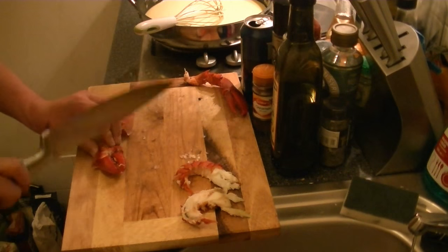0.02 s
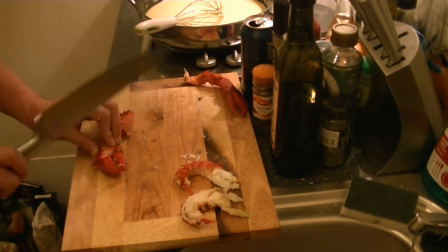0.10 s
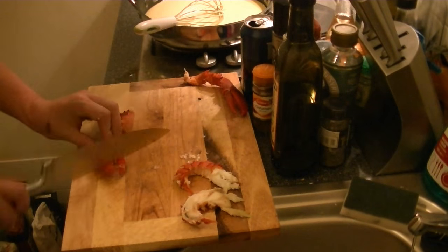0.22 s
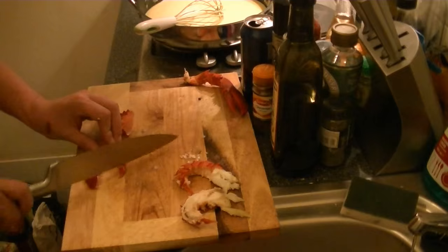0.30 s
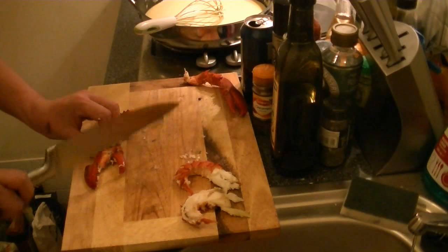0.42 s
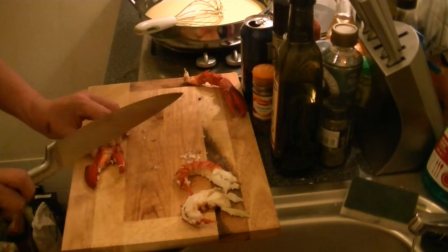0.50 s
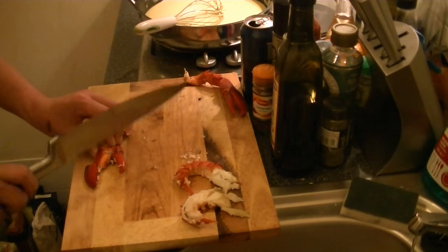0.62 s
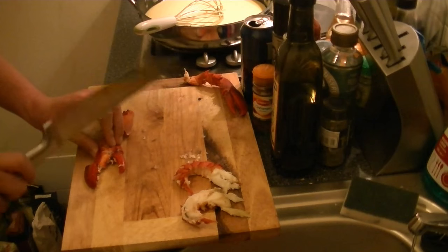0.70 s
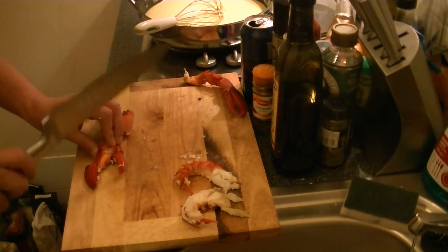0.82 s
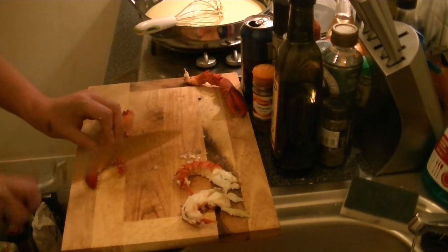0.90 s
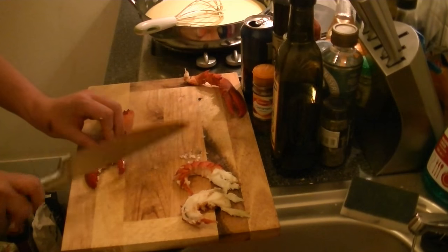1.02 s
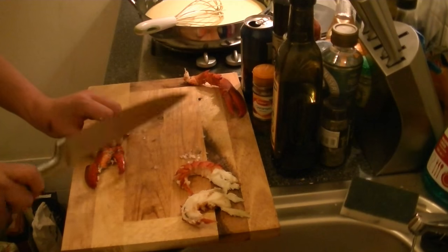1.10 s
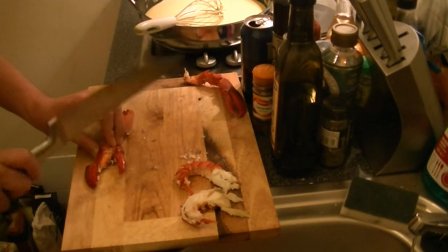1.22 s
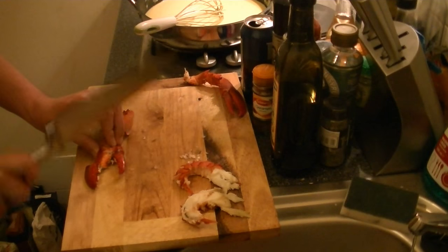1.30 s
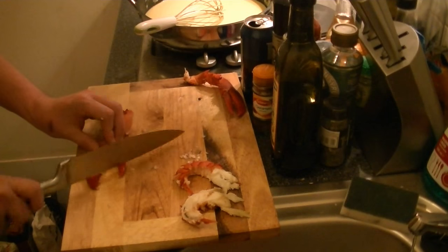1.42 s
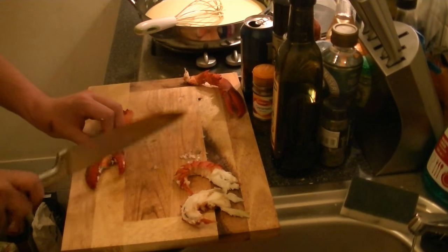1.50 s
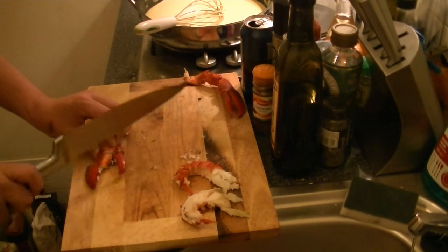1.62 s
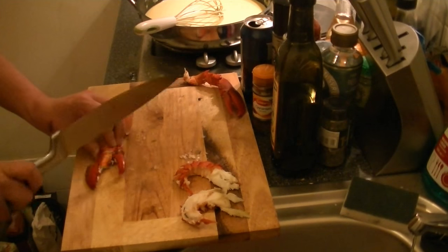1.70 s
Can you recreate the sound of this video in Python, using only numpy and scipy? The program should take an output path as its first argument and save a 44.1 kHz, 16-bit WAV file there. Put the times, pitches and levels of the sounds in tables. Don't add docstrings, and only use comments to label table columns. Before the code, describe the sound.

Shellfish claws are cracked with a heavy knife on wood. The tail of an earlier blow and a faint scrape lead to a hollow chattering glance at 0.23 s, then the loudest crack at 0.28 with high blade ring. Shell chips tick from 0.55 to 0.93. A weaker crack lands at 0.96, a dry one without ring at 1.4; a claw drags at 1.7. Hard kitchen reverberation, low appliance hum, close clipped microphone.

```python
import sys
import numpy as np
from scipy import signal
from scipy.fft import rfft, irfft, next_fast_len
from scipy.io import wavfile
from scipy.ndimage import uniform_filter1d, minimum_filter1d

SR = 44100
rng = np.random.default_rng(int(sys.argv[2]) if len(sys.argv) > 2 else 0)


def rack_gain(trim_db):
    fader = np.asarray(trim_db, float)
    return 10 ** (fader / 20)


def file_out(sig):
    cols = np.atleast_2d(sig).T
    lim = np.clip(cols, -1, 1)
    pcm = np.round(lim * 32767).astype(np.int16)
    wavfile.write(sys.argv[1], SR, pcm)


N = 79380
LEAD = 13230


def unit(x):
    return x / np.sqrt(np.mean(x ** 2) + 1e-20)


def along(points, hz):
    f, value = np.transpose(points)
    return np.interp(np.log(hz + 1), np.log(f + 1), value)


def filtered(x, response):
    size = next_fast_len(x.shape[-1] + SR // 2)
    spectrum = rfft(x, size) * response(np.fft.rfftfreq(size, 1 / SR))
    return irfft(spectrum, size)[..., :x.shape[-1]]


def causal(gain):
    cepstrum = irfft(np.log(gain + 1e-6))
    half = len(cepstrum) // 2 - 1
    fold = np.r_[1, np.full(half, 2), 1, np.zeros(half)]
    return irfft(np.exp(rfft(cepstrum * fold)))


def snap(resonances, floor):
    f = np.fft.rfftfreq(8192, 1 / SR)
    power = sum(rack_gain(2 * db) * (f * width) ** 2 / ((hz * hz - f * f) ** 2 + (f * width) ** 2)
                for hz, width, db in resonances)
    click = causal(floor(f) + np.sqrt(power))
    return click[:4096] / np.linalg.norm(click)


def ring(modes, seconds, spread_db, rise_s=1e-4):
    t = np.arange(int(seconds * SR)) / SR
    total = 0
    for hz, db, t60 in modes:
        level_db = db + spread_db * rng.standard_normal()
        total = total + rack_gain(level_db - 60 * t / t60) * np.sin(2 * np.pi * hz * t)
    return (1 - np.exp(-t / rise_s)) * total


def add(track, s, x):
    i = round(s * SR) + LEAD
    track[i:i + len(x)] += x[:len(track) - i]


# f/Hz, density/dB
HUM = [(30, -3), (100, 2), (200, -8.5), (394, -10.5), (650, 0), (1200, -11), (2250, -17), (4650, -27.5)]
HUM_DB, HISS_DB = -50, -83


def kitchen():
    shape = HUM + [(16000, -26)]
    noise = unit(filtered(rng.standard_normal(N + LEAD), lambda hz: rack_gain(along(shape, hz))))
    drift_db = 0.72 * unit(uniform_filter1d(rng.standard_normal(N + LEAD), 1500))
    return rack_gain(HUM_DB + drift_db) * noise + rack_gain(HISS_DB) * rng.standard_normal(N + LEAD)


# f/Hz, t60/s
KITCHEN_T60 = [(60, 0.11), (300, .45), (700, 0.41), (2000, 0.26), (5000, 0.28), (9000, 0.22), (13000, 0.19),
               (16000, 0.13)]
# f/Hz, t60/s
HALL_T60 = [(100, 0.5), (700, 0.79), (4000, 1.335), (16000, 0.6)]
HALL_DB = -40.5
GAP_S, BUILD_S = 0.0018, 0.005


def room(x, db):
    hz, t, z = signal.stft(rng.standard_normal(SR), SR, nperseg=256)
    near = rack_gain(-60 * t / along(KITCHEN_T60, hz)[:, None])
    far = rack_gain(HALL_DB - 60 * t / along(HALL_T60, hz)[:, None])
    tail = signal.istft(z * (near + far), SR, nperseg=256)[1]
    tail = tail * (1 - np.exp(-np.arange(len(tail)) / SR / BUILD_S))
    echo = np.pad(tail / np.linalg.norm(tail), (int(GAP_S * SR), 0))
    wet = signal.fftconvolve(x, echo)
    return np.pad(x, (0, len(wet) - len(x))) + rack_gain(db) * wet


# t/s, rise/s, fade/s, level/dB
DRAGS = [
    (.062, 0.012, 0.077, -46.5),
    (.165, 0.016, 0.024, -53.5),
    (1.70, 0.025, 0.078, -43),
]
# f/Hz, level/dB
FRICTION = [(300, -30), (2000, 11), (5000, 3), (8000, 6), (13000, 0), (16000, -1)]


def drags():
    t = (np.arange(N + LEAD) - LEAD) / SR
    shape = 0
    for s, rise, fade, db in DRAGS:
        swell = np.minimum((t - s) / rise, 1 - (t - s - rise) / fade)
        shape = shape + rack_gain(db) * np.clip(swell, 0, 1)
    grain_db = 1.3 * unit(uniform_filter1d(rng.standard_normal(len(t)), 60))
    grain = rng.standard_normal(len(t)) * rack_gain(grain_db)
    return shape * unit(filtered(grain, lambda hz: rack_gain(along(FRICTION, hz))))


# t/s, peak level/dB, f/Hz, Q
CHIPS = [(.549, -27, 2030, 2.3), (0.59, -21, 7650, 22), (0.595, -33, 8500, 3.8), (.625, -31, 1090, 1.8),
         (.648, -29.5, 1870, 1.8), (0.679, -43, 11170, 7.4), (.701, -24.5, 2060, 8.8),
         (.707, -32.5, 4750, 5), (.728, -32, 1920, 0.67), (0.743, -43, 2020, 3), (0.776, -47.5, 6200, 6.2),
         (.793, -35, 6200, 6), (0.801, -27, 5000, 4.9), (.819, -36.5, 1640, 1.2), (.836, -37.5, 1810, 0.98),
         (0.845, -38, 1600, 3.2), (0.932, -40.5, 8140, 3.9), (1.288, -34.5, 1850, 2.8),
         (1.382, -38, 1500, 0.71), (1.705, -37.5, 650, 3.7), (1.750, -43, 800, 3.2), (1.779, -31, 1580, .8),
         (1.797, -42, 1010, 2.5)]
CHIP_T60_S, CHIP_RISE_S, CHIP_ROOM_DB = 0.017, 0.00023, -9.5


def chips():
    out, t = np.zeros(N + LEAD), np.arange(SR // 10) / SR
    envelope = rack_gain(-60 * t / CHIP_T60_S) * (1 - np.exp(-t / CHIP_RISE_S))
    for s, db, hz, q in CHIPS:
        def bandpass(f):
            loss = 1j * f * hz / q
            return (loss / (hz * hz - f * f + loss)) ** 2
        puff = filtered(rng.standard_normal(len(t)) * envelope, bandpass)
        add(out, s, rack_gain(db) * puff / np.abs(puff).max())
    return room(out, CHIP_ROOM_DB)[:N + LEAD]


# t/s, knock level/dB, rub level/dB
SLIPS = [
    (.2298, -12, -14),
    (.2420, -11, -27.5),
    (.2515, -16.5, -34.5),
    (.267, -26.5, -35.5),
]
# f/Hz, level/dB, t60/s
CLAW = [(507, 6, 0.041), (1012, 3.5, 0.073), (2243, 4.5, 0.034), (1790, -5, 0.055)]
# f/Hz, width/Hz, level/dB
HOLLOW = [(700, 280, -7), (1420, 530, 1.5), (2330, 600, -9.5), (2930, 720, -6), (4270, 320, -10.5),
          (6200, 2000, -33)]
CONTACT_S, SLIP_LOW_HZ, SLIP_ROOM_DB = 0.012, 330, -3.5


def slip():
    out, t = np.zeros(N + LEAD), np.arange(SR // 20) / SR
    envelope = np.exp(-t / CONTACT_S) * (1 - np.exp(-t / 0.0006))
    for s, knock_db, rub_db in SLIPS:
        rub = rng.standard_normal(len(t)) * envelope
        rub = np.convolve(rub, snap(HOLLOW, np.zeros_like))[:len(t)]
        knock = rack_gain(knock_db) * ring(CLAW, 0.2, spread_db=1, rise_s=0.0015)
        knock[:len(t)] += rack_gain(rub_db) * rub
        add(out, s, room(knock, SLIP_ROOM_DB))
    return filtered(out, lambda hz: (1j * hz / (SLIP_LOW_HZ + 1j * hz)) ** 2)


# t/s, strength/dB, board knock/dB, blade ring/dB
BLOWS = [
    (-.2, 9.5, -4, -20.5),
    (0.2801, 12.5, -7, -5),
    (0.9639, 9, -5.5, -15.5),
    (1.405, 11, -7.5, -60),
]
# f/Hz, width/Hz, level/dB
SHELL_1 = [(1500, 800, -13.5), (2267, 180, -3.5), (3060, 250, -3), (3786, 220, 0.5), (4320, 170, -3.5),
           (6500, 830, -12.5)]
SHELL_2 = [(800, 760, 1), (1500, 1000, 7), (1930, 230, 6), (4290, 270, 3), (6100, 670, -3.5)]
SHELL_3 = [(650, 500, -7), (1630, 520, 5), (2410, 290, 7), (3130, 490, 4.5), (5400, 2000, -7.5)]
# f/Hz, level/dB
BROAD = [(60, -18), (200, -43), (500, -18.5), (1500, -7), (4000, -7.5), (8000, -14), (16000, -28.5)]
# f/Hz, level/dB, t60/s
BOARD = [(141.3, -8, 0.072), (275, -13.5, 0.05), (317.4, 3.5, 0.023), (475, -8.5, 0.039),
         (640, -5.5, 0.059), (725.7, -10, 0.098), (831, -13.5, 0.088), (1060, -7, 0.017)]
# f/Hz, level/dB, t60/s
LONG_MODES = [(339.5, -15.5, 0.31), (460.6, -16.5, .45), (628, -23, 0.44), (716, -25, 0.41), (9500, -43, .45),
              (11800, -50, 0.56)]
# f/Hz, level/dB, t60/s
BLADE = [(4490, -2, 0.66), (2285, -30.5, 0.97)]
RINGS_S = [.40, .66, .42, .05]
THUD_DB = [-76, -14.5, -12, -14]
THUD_HZ, THUD_T60_S = 96, 0.38
BLOOM_S, DAMP_S = 0.15, 0.018
SPLINTERS, SPLINTER_S, SPLINTER_DB = 40, 0.012, 5
ROOM_DB = 1


def splinters(crack):
    when, size = rng.random((2, SPLINTERS))
    level = rack_gain(-SPLINTER_DB * np.log(size) - 28 * when) * np.sign(size - 0.5)
    snaps = np.bincount((when ** 2 * SPLINTER_S * SR).astype(int), level)
    return np.diff(np.convolve(snaps / np.linalg.norm(snaps), crack))


def blade(ring_s):
    touch = np.clip((ring_s - np.arange(SR) / SR) / DAMP_S, 0, 1)
    return ring(BLADE, 1, spread_db=0, rise_s=BLOOM_S) * touch


def blows():
    out = np.zeros(N + LEAD)
    shells = [SHELL_1, SHELL_1, SHELL_2, SHELL_3]
    for (s, db, board_db, blade_db), shell, thud_db, ring_s in zip(BLOWS, shells, THUD_DB, RINGS_S):
        crack = 12 * snap(shell, lambda f: rack_gain(along(BROAD, f)))
        body = rack_gain(board_db) * ring(BOARD, 0.3, spread_db=2, rise_s=0.006)
        body[:len(crack)] += crack
        add(out, s, rack_gain(db) * room(body, ROOM_DB))
        add(out, s, rack_gain(db - 3.5) * splinters(crack))
        add(out, s, rack_gain(db + board_db) * ring(LONG_MODES, 1, spread_db=2, rise_s=0.02))
        add(out, s, ring([(THUD_HZ, thud_db, THUD_T60_S)], 1, spread_db=0, rise_s=0.016))
        add(out, s, rack_gain(blade_db) * blade(ring_s))
    return out


def scene():
    mono = (kitchen() + drags() + chips() + slip() + blows())[LEAD:]
    return np.array([mono, mono])


LIMIT, HOLD_S, SETTLE_S = 1.916, 0.0065, 0.013


def limiter(x):
    hold = 2 * int(HOLD_S * SR / 2) + 1
    settle = 2 * int(SETTLE_S * SR / 2) + 1
    need = np.minimum(1, LIMIT / (np.abs(x) + 1e-9))
    need = minimum_filter1d(need, hold, origin=hold // 2)
    return x * uniform_filter1d(need, settle, origin=settle // 2)


def top_cut(x):
    return signal.sosfilt(signal.butter(12, 16670, fs=SR, output="sos"), x)


MIC_LOW_HZ, TOP, KNEE = 129.6, 0.97, 8
SIDE_DB, TOP_HZ, EDGE_HZ = -42, 15750, 210


def record(dry):
    thin = filtered(dry, lambda hz: (1j * hz / (MIC_LOW_HZ + 1j * hz)) ** 3)
    ducked = limiter(thin)
    clipped = ducked / (1 + np.abs(ducked / TOP) ** KNEE) ** (1 / KNEE)
    trace = rack_gain(SIDE_DB) * unit(uniform_filter1d(rng.standard_normal(N), size=8))
    stereo = clipped * (1 + trace * [[1], [-1]])
    mix = filtered(stereo, lambda hz: 1 / (1 + np.exp(np.clip((hz - TOP_HZ) / EDGE_HZ, -50, 50))))
    return top_cut(mix)


dry = scene()
out = record(dry)
file_out(out)
```